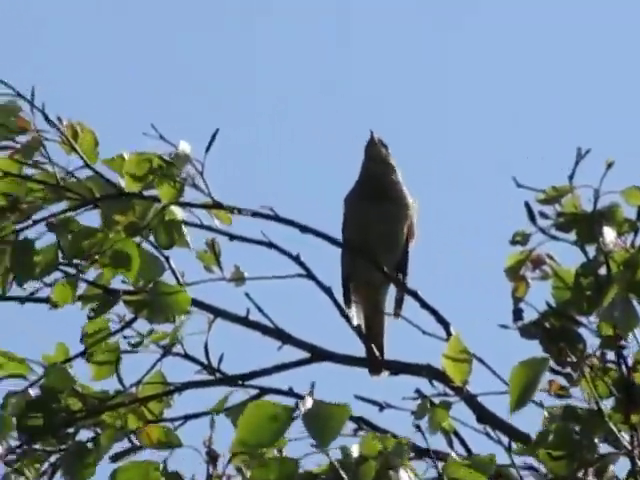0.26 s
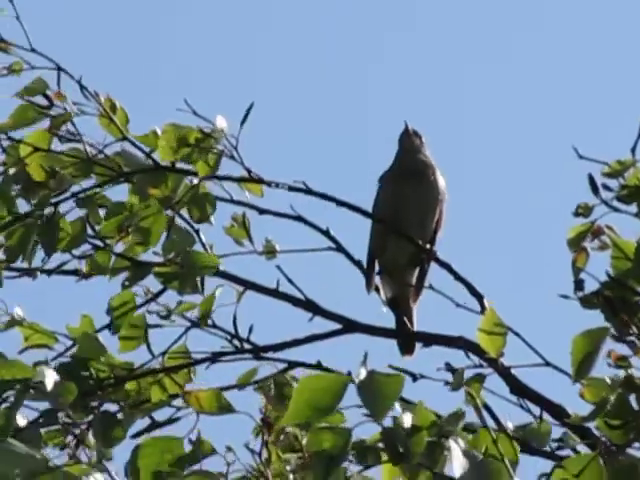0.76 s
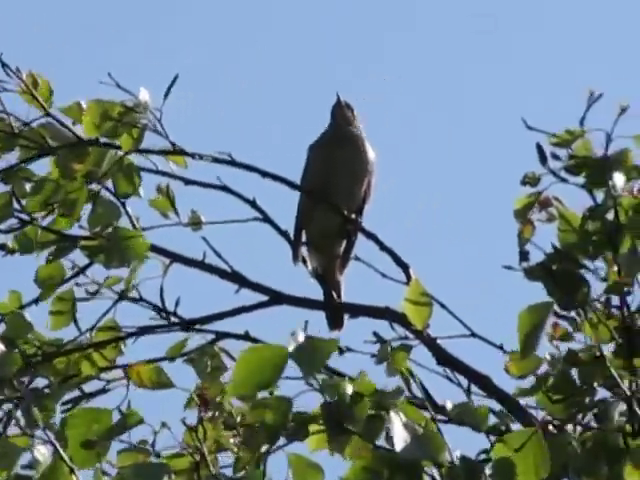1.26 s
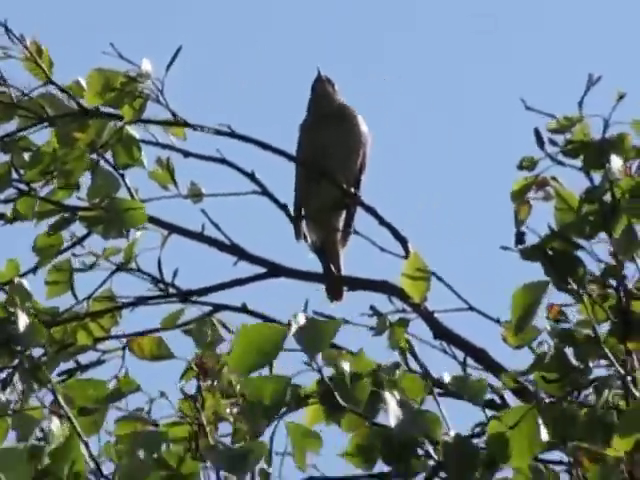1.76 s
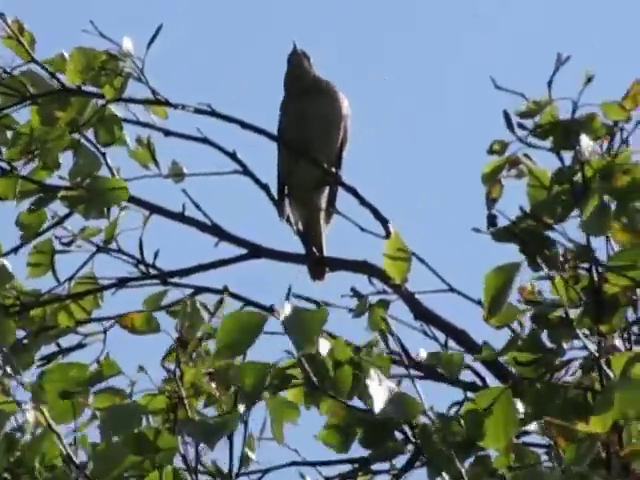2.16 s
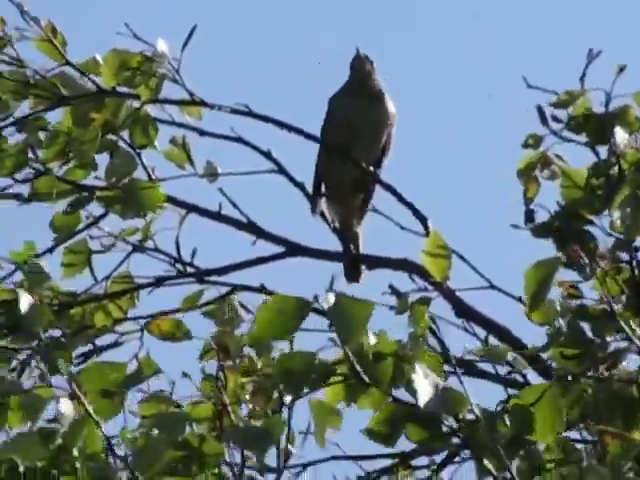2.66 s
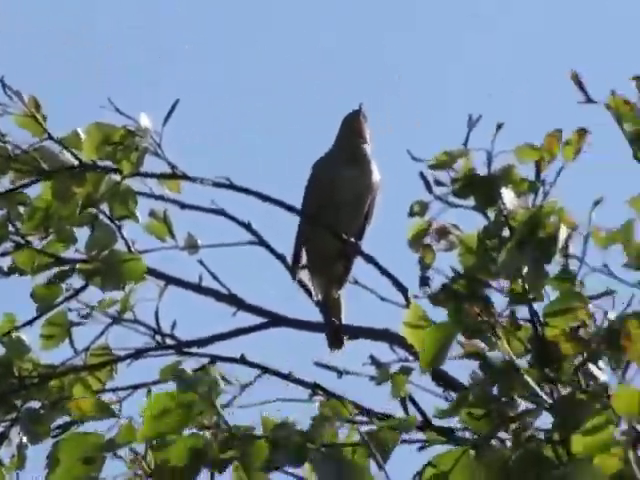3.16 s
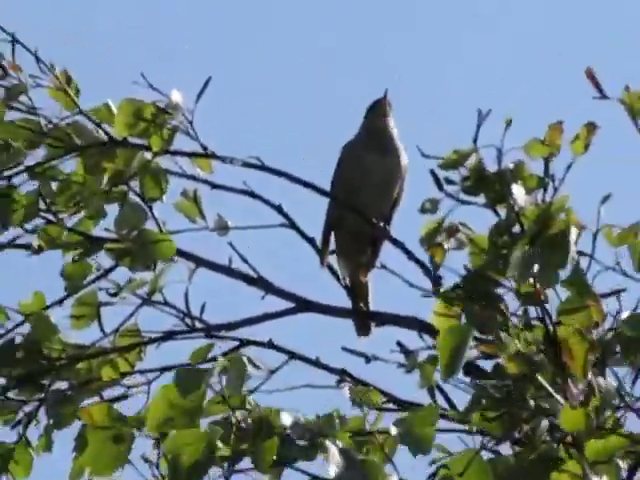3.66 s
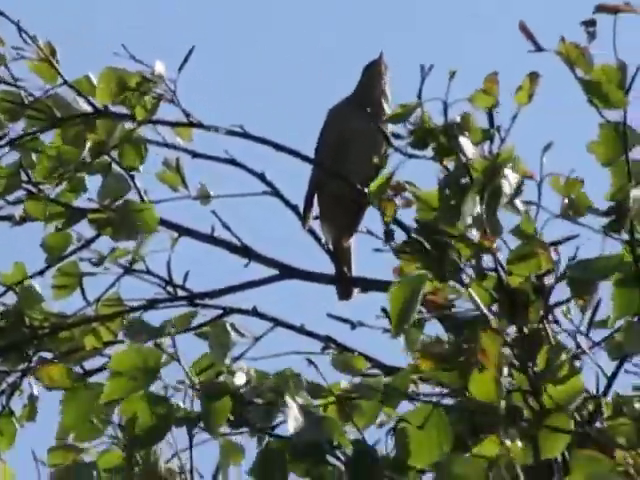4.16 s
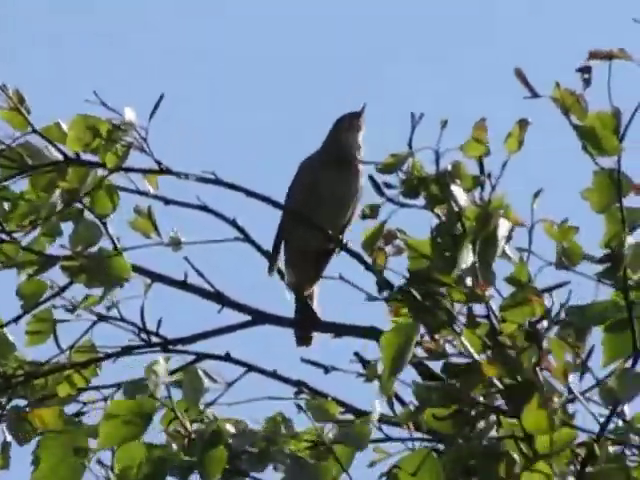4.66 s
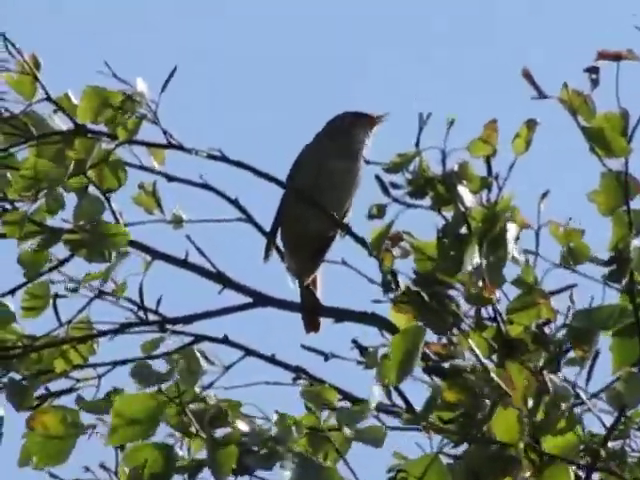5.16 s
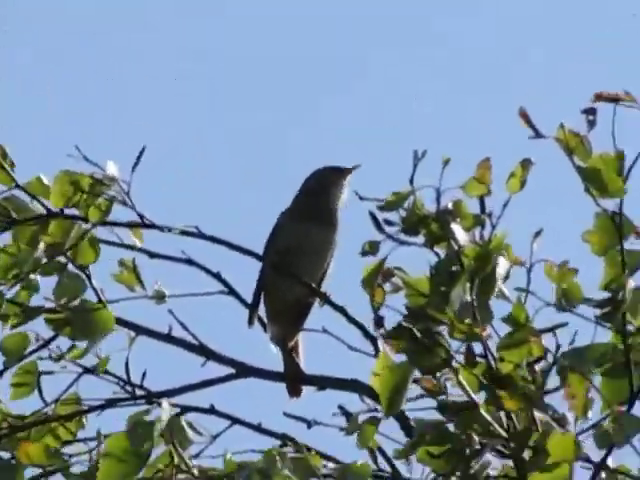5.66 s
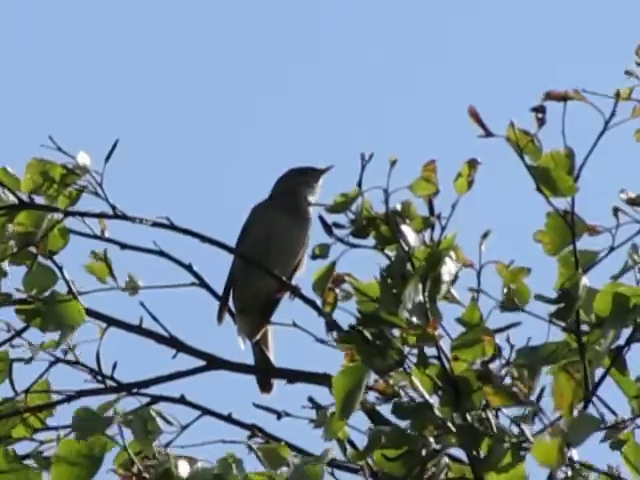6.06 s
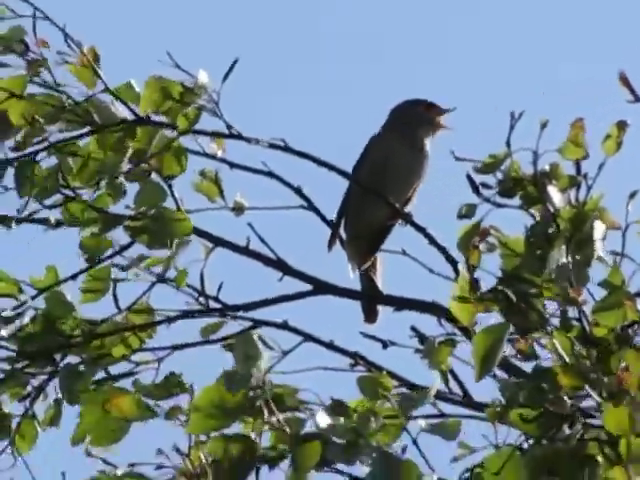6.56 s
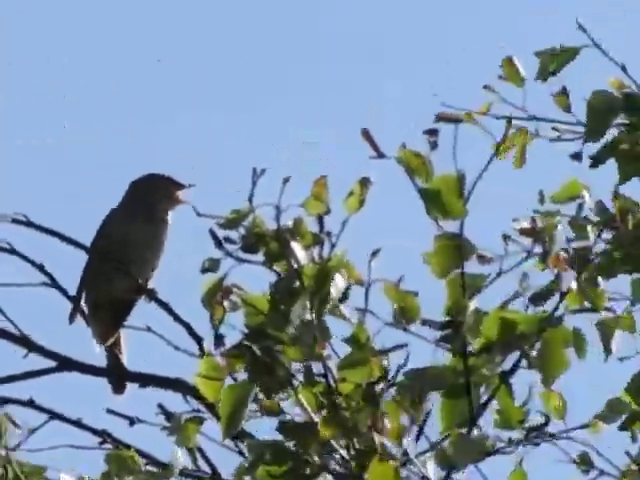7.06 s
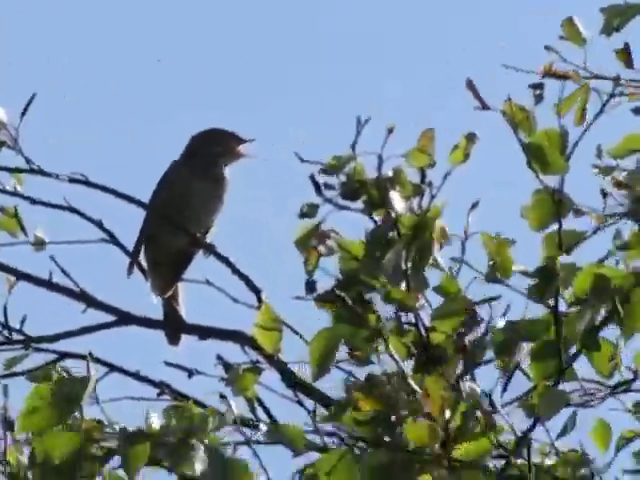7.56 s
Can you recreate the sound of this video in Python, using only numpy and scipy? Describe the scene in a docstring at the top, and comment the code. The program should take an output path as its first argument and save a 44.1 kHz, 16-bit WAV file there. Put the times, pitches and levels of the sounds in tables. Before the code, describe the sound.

Faint birds warble outdoors, something rustles briefly, then a loud songbird whistles, gives sharp paired notes and runs into a clicking rattle.

```python
"""Far birds warble and chip over a low outdoor rumble and faint hiss. Something rustles close by, and a
nightingale sings from a treetop: thin high whistles, a low whistle that swoops up, three pairs of
plunging 'chook' notes, then a dry rattle of clicks. Its syrinx makes the notes as nearly pure tones,
the rattle as pulses that ring the throat. Leaves and ground scatter the song."""
import sys
import numpy as np
from scipy import signal
from scipy.fft import rfft, irfft, next_fast_len
from scipy.io import wavfile
from scipy.ndimage import uniform_filter1d

SR = 44100
rng = np.random.default_rng(int(sys.argv[2]) if len(sys.argv) > 2 else 0)


def wav_record(signal):
    """Record a signal, one row per channel, as 16-bit PCM in the file named by sys.argv[1]."""
    frames = np.transpose(np.atleast_2d(signal))
    bounded = np.clip(frames, -1, 1)
    # unit amplitude maps onto the largest positive 16-bit level
    quanta = np.round(bounded * 32767).astype(np.int16)
    wavfile.write(sys.argv[1], SR, quanta)


N = 344862


def from_db(db):
    return 10 ** (np.asarray(db) / 20)


def unit_rms(x):
    return x / np.sqrt(np.mean(x ** 2) + 1e-20)


def seconds(length_s):
    return np.arange(int(length_s * SR)) / SR


def at_hz(curve, hz):
    """Interpolate (freq_hz, value) rows on a log-frequency axis."""
    freq_hz, value = np.transpose(curve)
    return np.interp(np.log(hz + 1), np.log(freq_hz), value)


def colour(x, curve):
    """Minimum-phase filter from (freq_hz, gain_db) rows."""
    size = 2 * next_fast_len(x.shape[-1])
    cepstrum = irfft(np.log(from_db(at_hz(curve, np.fft.rfftfreq(size, 1 / SR)))))
    cepstrum[1:size // 2] *= 2
    cepstrum[size // 2 + 1:] = 0
    return irfft(rfft(x, size) * np.exp(rfft(cepstrum)))[..., :x.shape[-1]]


def add(out, start_s, sound):
    i = max(round(start_s * SR), 0)
    out[..., i:i + sound.shape[-1]] += sound[..., :max(N - i, 0)]


def waver(t, rate_hz):
    """Interpolated noise, spread about 1."""
    return np.interp(t * rate_hz, np.arange(400), rng.standard_normal(400))


def air(spectrum):
    """Steady stereo noise, most alike in the bass."""
    # left-right likeness: freq_hz, correlation
    likeness = [(30, 0.81), (120, 0.98), (300, 0.94), (600, 0.54), (900, 0.43), (2000, 0.18), (12000, 0.14)]
    hz = np.fft.rfftfreq(N, 1 / SR)
    alike = at_hz(likeness, hz)
    mid, side = rfft(rng.standard_normal((2, N))) * from_db(at_hz(spectrum, hz))
    return unit_rms(irfft(np.sqrt(1 + alike) * mid + np.sqrt(1 - alike) * side * [[1], [-1]], N))


def rumble(level_db=-43.5, drone_rest_db=-0.9):
    """A far drone swells and sinks within the steady outdoor rumble."""
    # rumble spectrum: freq_hz, density_db
    spectrum = [(12, -32), (20, -8), (44, -5.5), (86, -1), (110, -2.5), (134, -13.5), (154, -8.5),
                (172, -1.5), (191, -2.5), (220, -10.5), (241, -12), (263, -7.5), (288, -9), (315, -22),
                (350, -13), (396, -21), (433, -20), (536, -22), (586, -25.5), (866, -15), (947, -24.5),
                (1030, -18.5), (1400, -30), (1820, -65), (3080, -120)]
    # drone swells: peak_s, gain_db, half_width_s
    swells = [(1.3, 2.5, 0.79), (5.55, 5, 0.62)]
    noise = from_db(level_db) * air(spectrum)
    drone = signal.sosfiltfilt(signal.butter(2, [130, 420], "band", fs=SR, output="sos"), noise)
    t = np.arange(N) / SR
    swell_db = sum(db * np.exp(-((t - peak_s) / half_s) ** 2) for peak_s, db, half_s in swells)
    return noise + drone * (from_db(drone_rest_db + swell_db) - 1)


def hiss(level_db=-59.5):
    """Faint, steady outdoor hiss."""
    # hiss spectrum: freq_hz, density_db
    spectrum = [(700, -27), (1200, -3.5), (1600, 3), (2500, 0.5), (4000, 0), (6000, -4), (9000, -9.5),
                (11500, -11.5), (15000, -18), (16500, -25.5)]
    return from_db(level_db) * air(spectrum)


def slur(length_s, pitches_hz, rough, knee_hz=4800, loss_db_per_oct=24):
    """A far bird's pure note glides through evenly spaced pitches, weaker above the knee."""
    t = seconds(length_s)
    glide_hz = np.interp(t, np.linspace(0, length_s, len(pitches_hz)), pitches_hz)
    glide_hz = uniform_filter1d(glide_hz, size=400, mode="nearest")
    pitch_hz = glide_hz * (1 + rough * waver(t, 300))
    loss_db = loss_db_per_oct * np.log2(np.maximum(glide_hz / knee_hz, 1))
    envelope = np.sin(np.pi * t / length_s) ** 0.35 * from_db(-loss_db)
    return envelope * np.sin(2 * np.pi * np.cumsum(pitch_hz) / SR)


def far_song():
    """A far bird warbles with a few kinds of syllable."""
    # pitch contours: syllable -> ratios to start_hz
    contours = {"hook": (1.02, 1.19), "fall": (0.86, 0.78), "sweep": (1.12, 1.5, 1.96, 2.0),
                "climb": (1.13, 1.21, 1.35), "level": (0.99, 0.95), "arch": (1.09, 1.08, 1.08),
                "dip": (0.85, 0.78, 0.84, 1)}
    # song: start_s, syllable, length_s, start_hz, level_db
    notes = [(0.044, "hook", 0.05, 3970, -52.5), (0.115, "level", 0.064, 6080, -49),
             (0.215, "hook", 0.057, 4070, -48), (0.341, "hook", 0.05, 4020, -43.5),
             (0.488, "level", 0.049, 4860, -43.5), (0.524, "fall", 0.076, 4930, -44),
             (0.692, "fall", 0.076, 5110, -43), (0.835, "sweep", 0.092, 2850, -45.5),
             (0.985, "sweep", 0.08, 2880, -43.5), (1.138, "sweep", 0.081, 2820, -44),
             (1.277, "hook", 0.048, 3660, -41.5), (1.317, "fall", 0.07, 3880, -45.5),
             (1.489, "climb", 0.16, 2785, -47), (1.732, "level", 0.046, 4354, -49),
             (1.743, "climb", 0.144, 2750, -47), (1.957, "fall", 0.031, 3200, -53),
             (1.993, "arch", 0.039, 3335, -46), (2.078, "fall", 0.045, 3390, -53),
             (2.122, "level", 0.046, 3910, -50.5), (2.219, "dip", 0.15, 3350, -54.5),
             (2.86, "level", 0.23, 4900, -57.5), (3.9, "fall", 0.05, 4100, -60),
             (3.96, "climb", 0.06, 2770, -59.5), (4.122, "fall", 0.05, 3810, -58),
             (4.182, "hook", 0.05, 3040, -57.5), (5.887, "level", 0.05, 3950, -47),
             (6.042, "arch", 0.09, 3600, -49)]
    out = np.zeros(N)
    for start_s, syllable, length_s, start_hz, level_db in notes:
        pitches_hz = start_hz * np.array([1, *contours[syllable]])
        add(out, start_s, from_db(level_db) * slur(length_s, pitches_hz, rough=0.0063))
    return out


def far_chips(spacing_s=0.048):
    """Quick downward chips in pairs."""
    # chip pairs: start_s, level_db
    pairs = [(0.34, -52), (0.646, -49.5), (0.922, -48.5), (1.214, -49.5)]
    out = np.zeros(N)
    for start_s, level_db in pairs:
        for chip_s in (start_s, start_s + spacing_s):
            add(out, chip_s, from_db(level_db) * slur(length_s=0.02, pitches_hz=[3035, 1910], rough=0.015))
    return out


def ticks(decay_s=0.0017):
    """Soft, muffled bursts from the nightingale's throat."""
    # ticks: start_s, level_db
    bursts = [(1.743, -49), (4.645, -34.5), (4.659, -32.5)]
    # tick spectrum: freq_hz, gain_db
    spectrum = [(700, -33), (1300, -0.5), (2000, -6.5), (3000, -15), (5000, -28.5), (9000, -44.5),
                (16000, -45.5)]
    out, t = np.zeros(N), seconds(0.035)
    envelope = t / decay_s * np.exp(1 - t / decay_s)
    for start_s, level_db in bursts:
        noise = unit_rms(colour(rng.standard_normal(len(t)), spectrum))
        add(out, start_s, from_db(level_db) * envelope * noise)
    return out


def far_pips(start_s=2.165, every_s=0.145, count=5, level_db=-53.5):
    """High falling pips at an even pace."""
    out = np.zeros(N)
    for k in range(count):
        pip = slur(length_s=0.0394, pitches_hz=[5120, 4800], rough=0.015)
        add(out, start_s + k * every_s, from_db(level_db) * pip)
    return out


def rustles(ring_s=0.0038, grain_db=2.5, width=0.67, pan_db=2.4, lag_samples=5):
    """Dry, grainy brushes and taps close by on the left."""
    # brushes and taps: peak_s, level_db, rise_s, lowpass_hz
    brushes = [(3.127, -29, 0.0016, 6040), (3.144, -39.5, 0.0027, 6000), (3.162, -39.5, 0.0054, 6040),
               (3.218, -29.5, 0.0013, 4020), (3.33, -37.5, 0.01, 4000), (3.375, -36, 0.02, 3970),
               (3.419, -34, 0.023, 5000), (3.587, -34.5, 0.014, 3000), (3.6, -31.5, 0.0015, 3500),
               (3.616, -32.5, 0.0039, 1790), (3.95, -42, 0.0011, 700), (3.977, -41, 0.002, 700),
               (5.878, -34.5, 0.0012, 600)]
    # rustle spectrum: freq_hz, gain_db
    spectrum = [(200, -13), (450, -13.5), (800, -0.5), (1200, -11), (2000, -17), (4000, -17.5), (8000, -23),
                (13000, -28), (16000, -31)]
    out = np.zeros((2, N))
    for peak_s, level_db, rise_s, lowpass_hz in brushes:
        lead_s, fall_s = 3 * rise_s, ring_s + rise_s
        t = seconds(lead_s + 4 * fall_s)
        envelope = np.exp(-np.maximum((lead_s - t) / rise_s, (t - lead_s) / fall_s))
        mid, side = rng.standard_normal((2, len(t))) * from_db(grain_db * waver(t, 694))
        grains = colour(mid + width * side * [[1], [-1]], spectrum)
        dulled = signal.lfilter([1], [1, -np.exp(-2 * np.pi * lowpass_hz / SR)], grains)
        add(out, peak_s - lead_s, from_db(level_db) * envelope * unit_rms(dulled))
    return np.array([out[0], np.roll(out[1], lag_samples)]) * from_db([[pan_db / 2], [-pan_db / 2]])


def syrinx(pitch_hz, falloff_db_per_oct, overtone_db):
    """A nearly pure tone with weak overtones coloured by the beak."""
    # beak's overtone response: freq_hz, gain_db
    beak = [(2500, -23.5), (4000, -28), (5200, -31), (7000, -36.5), (9500, -36), (11800, -26.5),
            (13000, -30), (15500, -25), (17000, -40)]
    phase = 2 * np.pi * np.cumsum(pitch_hz) / SR
    tone = np.sin(phase)
    for k in range(2, 8):
        gain_db = overtone_db + at_hz(beak, k * pitch_hz) - falloff_db_per_oct * np.log2(k / 2)
        tone += from_db(gain_db) * np.sin(k * phase) * (k * pitch_hz < SR / 2)
    return tone


def whistle(pitch_hz, envelope, falloff_db_per_oct, overtone_db):
    """A syrinx note trembling slightly in pitch and level."""
    t = np.arange(len(pitch_hz)) / SR
    gate = np.clip(np.minimum(t, t[-1] - t) / 0.003, 0, 1)
    shimmer = from_db(0.7 * waver(t, 300))
    trembling_hz = pitch_hz * (1 + 0.0015 * waver(t, 250))
    return gate * envelope * shimmer * syrinx(trembling_hz, falloff_db_per_oct, overtone_db)


def flicks(attack_s=0.011, release_s=0.012, step_delay_s=0.0045, step_s=0.0031):
    """A thin flick ahead of each high whistle; its pitch steps up just after the peak."""
    # flicks: peak_s, start_hz, end_hz, level_db
    notes = [(3.209, 6990, 7330, -29), (3.783, 6595, 7220, -20), (4.801, 6790, 7810, -14)]
    out, t = np.zeros(N), seconds(0.05) - 0.025
    envelope = np.exp(-np.where(t < 0, (t / attack_s) ** 2, t / release_s))
    step = 1 / (1 + np.exp((step_delay_s - t) / step_s))
    for peak_s, start_hz, end_hz, level_db in notes:
        pitch_hz = start_hz + (end_hz - start_hz) * step
        note = whistle(pitch_hz, envelope, falloff_db_per_oct=10, overtone_db=4.5)
        add(out, peak_s + t[0], from_db(level_db) * note)
    return out


def high_whistles(attack_s=0.012, release_s=0.016, wobble_cycles=2):
    """Held notes grow louder until release while the pitch sags and wobbles."""
    # whistles: start_s, length_s, start_hz, end_hz, wobble_hz, level_db, crescendo_db
    notes = [(3.274, 0.1186, 6255, 5950, 5, -20, 15.5), (3.865, 0.11, 5967, 5772, 10.5, -14, 17.5),
             (4.88, 0.1183, 5985, 5883, 72, -13, 10)]
    out = np.zeros(N)
    for start_s, length_s, start_hz, end_hz, wobble_hz, level_db, crescendo_db in notes:
        t = seconds(length_s)
        pitch_hz = start_hz + (end_hz - start_hz) * (t / length_s) ** 0.65
        pitch_hz += wobble_hz * np.cos(2 * np.pi * wobble_cycles * t / length_s)
        gate = np.clip(np.minimum(t / attack_s, (length_s - t) / release_s), 0, 1)
        swell = from_db(level_db - crescendo_db * np.maximum(1 - t / (length_s - release_s), 0))
        add(out, start_s, whistle(pitch_hz, gate * swell, falloff_db_per_oct=15.5, overtone_db=-3))
    return out


def low_whistle(gain_db=3.5):
    """A round held note swells and sinks, then swoops up nearly an octave."""
    # whistle contour: time_s, pitch_hz, level_db
    contour = [(4.205, 2627, -55), (4.235, 2580, -28.5), (4.275, 2528, -19.5), (4.327, 2597, -22.5),
               (4.365, 2568, -32), (4.373, 2660, -28.5), (4.385, 2984, -25.5), (4.393, 3470, -25),
               (4.407, 4030, -19.5), (4.415, 4275, -19.5), (4.424, 4410, -30.5)]
    time_s, pitch_hz, level_db = np.transpose(contour)
    out, t = np.zeros(N), time_s[0] + seconds(time_s[-1] - time_s[0])
    glide_hz = uniform_filter1d(np.interp(t, time_s, pitch_hz), size=200)
    envelope = from_db(gain_db + np.interp(t, time_s, level_db))
    add(out, time_s[0], whistle(glide_hz, envelope, falloff_db_per_oct=13, overtone_db=0))
    return out


def far_murmur(start_s=4.72, every_s=0.18, count=6, centre_hz=3600, spread=0.13, level_db=-60):
    """A fainter bird's slurs wander at random around one pitch."""
    out = np.zeros(N)
    for k, (late, *bends) in enumerate(rng.uniform(-1, 1, (count, 4))):
        note = slur(length_s=0.07, pitches_hz=centre_hz * np.exp(spread * np.array(bends)), rough=0.006)
        add(out, start_s + (k + late / 2) * every_s, from_db(level_db) * note)
    return out


def chooks(length_s=0.036, attack_s=0.0014, hold_s=0.0039, release_s=0.0026, fade_db_per_s=590):
    """Abrupt, gritty notes plunge about an octave as they fade."""
    # chooks: start_s, level_db, pitch_ratio
    notes = [(5.2115, -14, 1.01), (5.296, -13.5, 0.98), (5.579, -12, 1.016), (5.6662, -13.5, 0.97),
             (5.9184, -12, 1), (6.0034, -12.5, 0.98)]
    out, t = np.zeros(N), seconds(length_s)
    plunge_hz = 1054 + 660 * np.exp(-t / 0.0005) + 1130 * np.exp(-t / 0.0155)  # rest + snap + slow sink
    gate = np.minimum(t / attack_s, 1) ** 2 * np.minimum((length_s - t) / release_s, 1)
    envelope = gate * from_db(-fade_db_per_s * np.maximum(t - hold_s, 0))
    for start_s, level_db, pitch_ratio in notes:
        grit = 1 + 0.011 * waver(t, 2450)
        tone = syrinx(pitch_ratio * plunge_hz * grit, falloff_db_per_oct=4, overtone_db=-0.5)
        add(out, start_s, from_db(level_db) * envelope * tone)
    return out


def pulsed_note(envelope, start_hz, end_hz, throat_hz, bandwidth_hz, jitter, rasp, beak):
    """The syrinx snaps open at a gliding rate, each pulse ringing the throat; peak about 1."""
    size = len(envelope)
    rate_hz = np.geomspace(start_hz, end_hz, size) * np.exp(jitter * waver(np.arange(size) / SR, 1500))
    cycles = np.floor(np.cumsum(rate_hz) / SR + rng.random())
    uneven, turbulence = rng.standard_normal((2, 2000))[:, :size]
    pulses = np.diff(cycles, prepend=0) * from_db(2.2 * uneven) + rasp * turbulence
    pulses = np.pad(envelope * pulses, (0, SR // 200))  # room to ring out
    radius, cosine = np.exp(-np.pi * bandwidth_hz / SR), np.cos(2 * np.pi * throat_hz / SR)
    throat = signal.lfilter([1, -radius * cosine], [1, -2 * radius * cosine, radius ** 2], pulses)
    sound = colour(throat, beak)
    return sound / np.sqrt(2 * uniform_filter1d(sound ** 2, size=60).max())


def buzz(swell_s, fade_s=0.004):
    """Pulses swell while their rate climbs over an octave."""
    # beak radiation: freq_hz, gain_db
    beak = [(700, 2), (1400, -2), (2600, 5), (4000, 7), (5300, 0), (7500, -10), (10000, -3.5), (12000, -18),
            (16000, -30)]
    length_s = swell_s + fade_s
    envelope = np.interp(seconds(length_s), [0, swell_s / 2, swell_s, length_s], [0.049, 0.37, 0.98, 0.3])
    return pulsed_note(envelope, start_hz=607, end_hz=1468, throat_hz=3990, bandwidth_hz=1050,
                       jitter=0.014, rasp=0.015, beak=beak)


def click(length_s, throat_hz):
    """A handful of fast, slowing pulses; length and throat pitch vary per click."""
    # beak radiation: freq_hz, gain_db
    beak = [(700, -33), (1300, -19), (1900, 0.5), (2700, 3), (3500, -0.5), (4800, 4.5), (6800, 0.5),
            (8200, -4), (9600, -9.5), (12000, -1.5), (14000, -15), (16000, -28)]
    length_s, throat_hz = [length_s, throat_hz] * np.exp([0.07, 0.025] * rng.standard_normal(2))
    envelope = np.sin(np.pi * seconds(length_s) / length_s) ** 1.08
    return pulsed_note(envelope, start_hz=2274, end_hz=1156, throat_hz=throat_hz, bandwidth_hz=1300,
                       jitter=0.27, rasp=0.044, beak=beak)


def rattle(swell_s=0.016, lead_s=0.0146, stumble_s=6.202, stumble_db=-23):
    """Rounds of buzz, hard click and lighter, higher click; one stray click in the first."""
    # rounds: hard_s, light_s, hard_db, light_db, buzz_db
    rounds = [(6.169, 6.248, -9, -16.5, -21.5), (6.315, 6.386, -9.5, -12, -17),
              (6.456, 6.527, -9, -12.5, -15.5), (6.5943, 6.6653, -9.5, -10, -17.5),
              (6.7334, 6.8031, -8, -9, -19), (6.8688, 6.9374, -8.5, -10.5, -17),
              (7.0042, 7.0723, -8, -13, -19), (7.1398, 7.211, -10.5, -12, -21.5),
              (7.278, 7.3557, -10, -11.5, -20), (7.4254, 7.5016, -10, -12.5, -18),
              (7.5693, 7.6399, -9, -12.5, -18.5), (7.7095, 7.795, -9, -13, -19)]
    hard_length_s, hard_hz = 0.006, 4680
    light_length_s, light_hz = 0.0048, 5230
    out = np.zeros(N)
    for hard_s, light_s, hard_db, light_db, buzz_db in rounds:
        add(out, hard_s - lead_s - swell_s, from_db(buzz_db) * buzz(swell_s))
        add(out, hard_s - hard_length_s / 2, from_db(hard_db) * click(hard_length_s, hard_hz))
        add(out, light_s - light_length_s / 2, from_db(light_db) * click(light_length_s, light_hz))
    add(out, stumble_s - light_length_s / 2, from_db(stumble_db) * click(light_length_s, light_hz))
    return out


def direct(x, lag_samples, pan_db):
    """Direct path: the left channel trails by lag_samples and is pan_db louder."""
    left = irfft(rfft(x) * np.exp(-2j * np.pi * np.fft.rfftfreq(N) * lag_samples), N)
    return np.array([left * from_db(pan_db / 2), x * from_db(-pan_db / 2)])


def trees(x, twig_db, crown_db, crown_t60_s, ground_db, far_db, far_t60_s):
    """Twigs by the perch, the crown, the ground and far trees each scatter the sound back."""
    # grassy ground's reflection: freq_hz, gain_db
    grass = [(1000, -4.5), (2200, -5), (4000, -2.5), (12000, -20)]
    # long path through far trees: freq_hz, gain_db
    long_path = [(1000, -3), (2500, -4), (3800, 1), (5000, -2.5), (6200, -11), (12000, -17)]
    # leaf scatter: freq_hz, gain_db
    leaves = [(500, 9.5), (1600, -1), (2600, -1), (4500, -2), (7000, -1.5), (12000, 1.5), (16000, -6)]
    t = seconds(1.0)
    twigs, crown, ground, far = (rng.standard_normal((4, 2, len(t)))
                                 + 0.5 * rng.standard_normal((4, 1, len(t))))  # common to both sides
    twigs = twigs * np.exp(-t / 0.0028) * (t > 0.001)
    crown = crown * from_db(2 * waver(t, 400) - 60 * t / crown_t60_s) * np.clip(t / 0.0021 - 0.3, 0, 1)
    ground = colour(ground * np.exp(-((t - 0.046) / 0.0082) ** 2), grass)
    far = colour(far * from_db(-60 * t / far_t60_s) * np.clip(t / 0.023, 0, 1), long_path)
    paths = [(twigs, twig_db), (crown, crown_db), (ground, ground_db), (far, far_db)]
    echo = sum(from_db(db) * unit_rms(path) for path, db in paths) / np.sqrt(len(t))
    return signal.fftconvolve(x[None], colour(echo, leaves), axes=1)[:, :N]


def scene():
    """The nightingale is nearly straight ahead; far birds arrive mostly as scatter."""
    song = flicks() + high_whistles() + low_whistle() + chooks() + rattle() + ticks()
    nightingale = direct(song, lag_samples=1, pan_db=0.5)
    nightingale += trees(song, twig_db=-10, crown_db=-11, crown_t60_s=0.21,
                         ground_db=-25.5, far_db=-23.5, far_t60_s=0.55)
    calls = far_song() + far_pips() + far_chips() + far_murmur()
    far_birds = direct(from_db(-5) * calls, lag_samples=4.7, pan_db=7.5)
    far_birds += trees(calls, twig_db=-4.5, crown_db=-2.5, crown_t60_s=0.17,
                       ground_db=-21.5, far_db=-11, far_t60_s=0.73)
    return nightingale + far_birds + rustles() + rumble() + hiss()


def record(dry):
    """Steep low-pass on the top treble."""
    cutoff_hz = 16200
    return signal.sosfilt(signal.ellip(10, 0.1, 80, cutoff_hz, fs=SR, output="sos"), dry)


dry = scene()
out = record(dry)
wav_record(out)
```